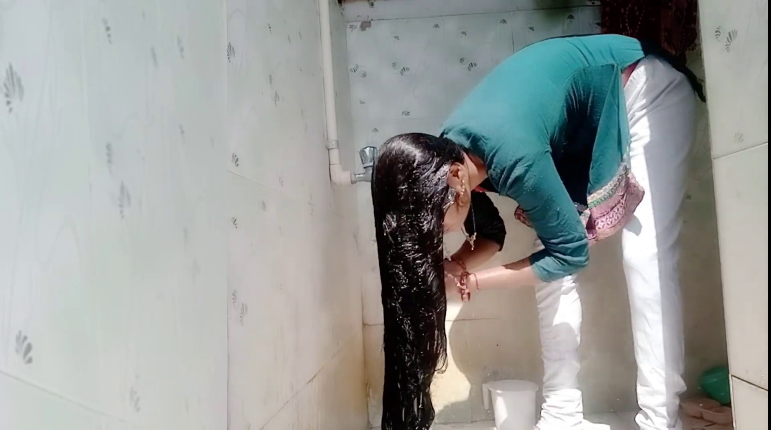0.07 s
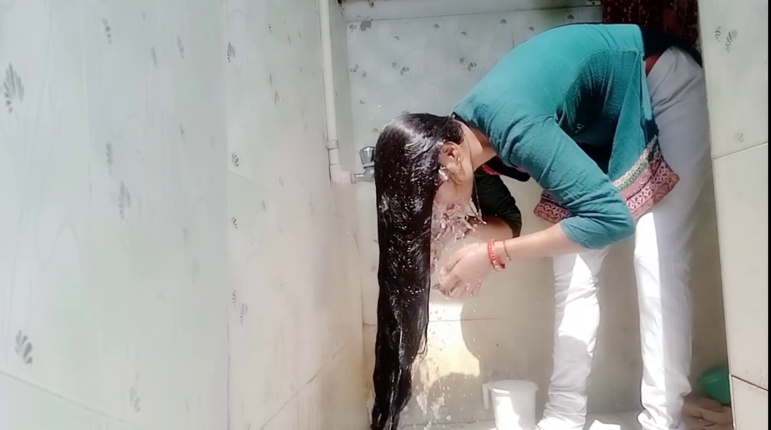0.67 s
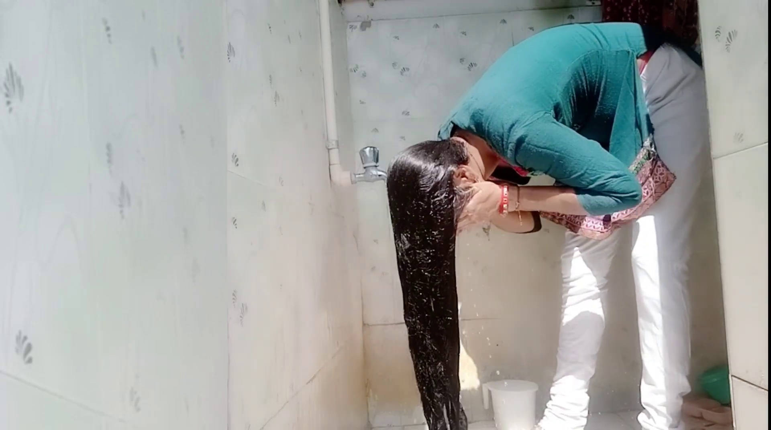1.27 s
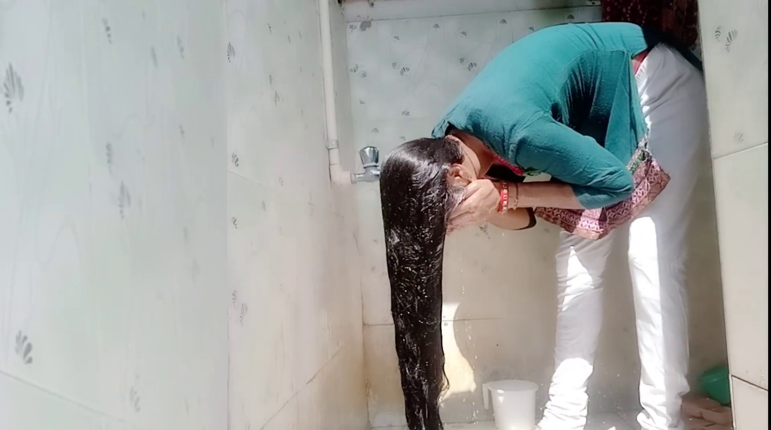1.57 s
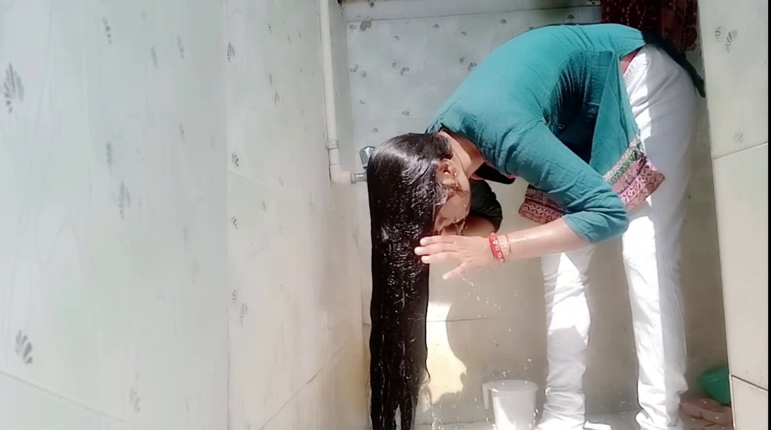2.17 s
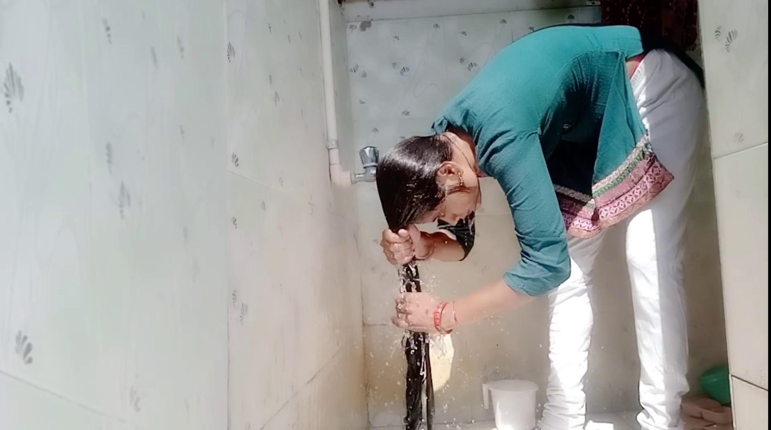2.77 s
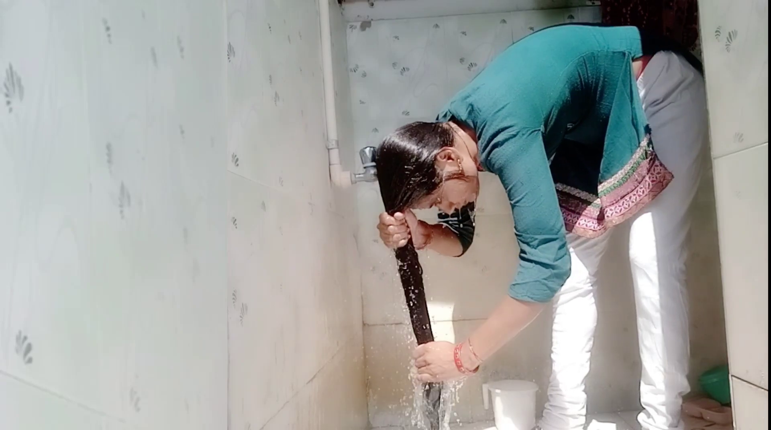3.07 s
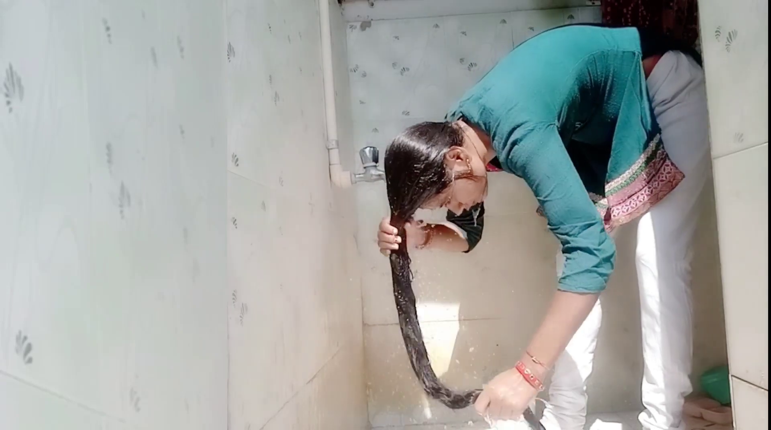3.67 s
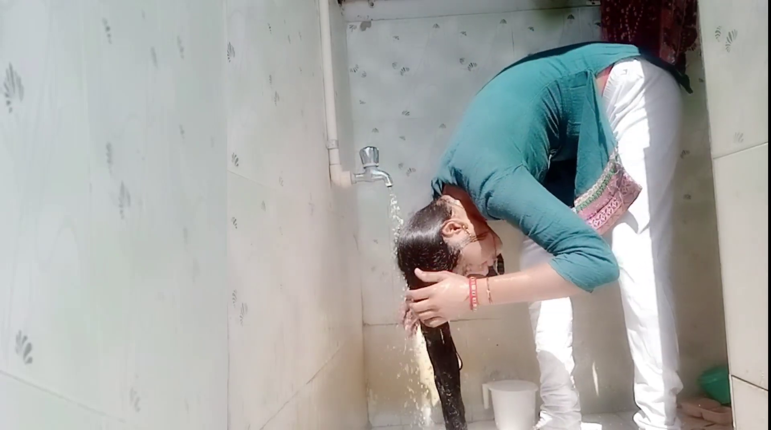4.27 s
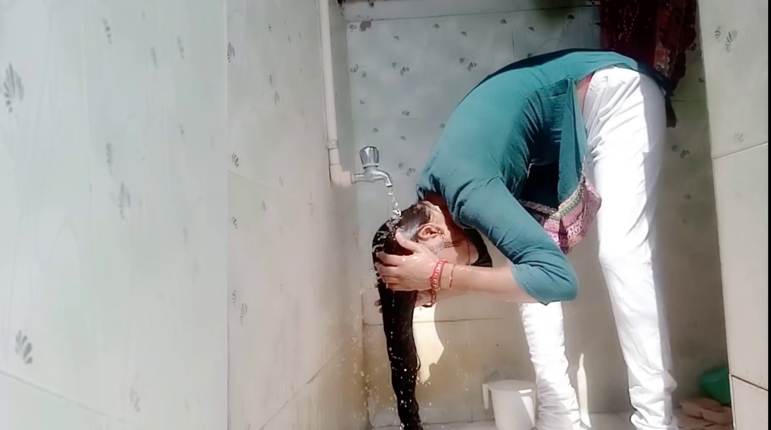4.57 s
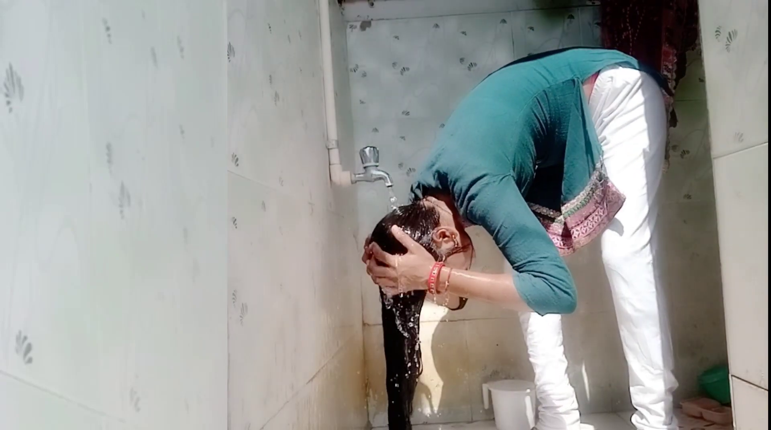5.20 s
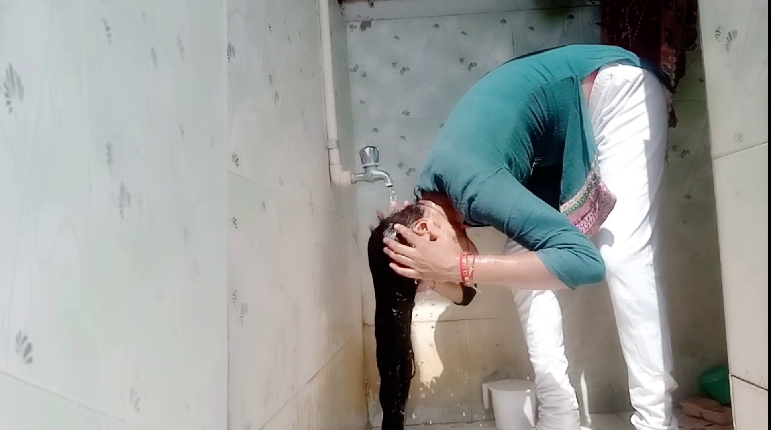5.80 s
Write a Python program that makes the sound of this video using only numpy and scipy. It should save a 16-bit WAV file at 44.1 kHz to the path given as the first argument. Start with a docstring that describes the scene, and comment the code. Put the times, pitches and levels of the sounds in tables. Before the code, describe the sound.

Water falls from a tap and off long wet hair, slapping a tiled floor in irregular splashes. Drops patter, fine spray ticks and small bubbles plop and gurgle. The splashing is strongest in the first two seconds, eases, swells again, then thins to lighter dripping with faint squelches of squeezed hair. It sounds close and bright, in a small hard-walled washing area with a faint low hum.

```python
"""Tap water slaps a wet tiled floor in slugs as someone rinses and wrings long hair in a small washing area.
Each impact excites a pocket of trapped air, thuds and throws spray; bubbles plop and gurgle as resonators.
Drops patter, fine spray ticks and the hair squelches; close hard walls return early reflections.
A low hum and a few soft bumps lie underneath; resonances of a phone's microphone port colour the treble."""
import sys
import numpy as np
from scipy import signal
from scipy.fft import rfft, irfft
from scipy.io import wavfile
from scipy.ndimage import uniform_filter1d

SR = 44100
rng = np.random.default_rng(int(sys.argv[2]) if len(sys.argv) > 2 else 0)


def store_pcm(level_fs):
    """Save levels as 16-bit WAV."""
    pcm = np.round(np.clip(level_fs, -1, 1) * 32767).astype(np.int16)
    wavfile.write(sys.argv[1], SR, np.atleast_2d(pcm).T)


N = 261954
TIME = np.arange(N) / SR
AGE = np.arange(SR // 4) / SR  # seconds since an impact

# spectral envelope of fine spray: frequency_hz, gain_db
SPRAY_SPECTRUM = [(300, 1), (1000, -2.5), (3200, -10), (4500, 3), (6500, 3), (10000, -5), (15500, -6)]


def undb(db):
    """Amplitude ratio of a level in decibels."""
    return 10 ** (np.asarray(db) / 20)


def unit(x):
    """Normalisation to an rms of 1."""
    return x / np.sqrt(np.mean(x ** 2))


def peak(x, db, size=176):
    """Normalisation of the greatest short-time rms (4 ms) to a given level."""
    return x * undb(db) / np.sqrt(uniform_filter1d(x ** 2, size).max())


def add(out, start_s, x):
    """Superposition of x on out from a given time."""
    i = max(int(start_s * SR), 0)
    out[i:i + len(x)] += x[:len(out) - i]


def convolve(x, response):
    """Convolution with an impulse response, cut to the input's length."""
    return signal.fftconvolve(x, response)[:len(x)]


def colour(x, spectrum, size=2048):
    """Minimum-phase filtering by an envelope of (frequency_hz, gain_db) points."""
    hz, db = np.transpose(spectrum)
    bins_hz = np.maximum(np.arange(size // 2 + 1) * SR / size, 1)
    gain = undb(np.interp(np.log(bins_hz), np.log(hz), db))
    cepstrum = irfft(np.log(gain))
    cepstrum[1:size // 2] *= 2  # folding the cepstrum makes the filter causal
    cepstrum[size // 2 + 1:] = 0
    return convolve(x, irfft(np.exp(rfft(cepstrum))))


def resonate(x, hz, width_hz):
    """Second-order resonance with unit gain at its centre."""
    return signal.lfilter(*signal.iirpeak(hz, hz / width_hz, fs=SR), x)


def walk(rate_hz):
    """Slow random modulation: smoothed Gaussian steps with an rms of 1."""
    hold = int(SR / rate_hz)
    steps = np.repeat(rng.standard_normal(N // hold + 2), hold)
    return unit(uniform_filter1d(steps, hold)[hold // 2:hold // 2 + N])


def tiles(x, wet_db=0, first_s=.001, last_s=.019, count=22, t60_s=0.17):
    """Room response: direct sound, early reflections drawn anew for each spot, and a reverberant tail."""
    echoes = np.zeros(len(AGE))
    lag_s = first_s + rng.random(count) * (last_s - first_s)
    polarity = np.sign(rng.standard_normal(count))
    echoes[(lag_s * SR).astype(int)] = polarity / (lag_s + last_s / 2)  # longer paths are weaker
    build_up = 1 - np.exp(-AGE / 0.0045)
    tail = rng.standard_normal(len(AGE)) * np.exp(-np.log(1000) * AGE / t60_s) * build_up
    response = undb(-1.5) * echoes / np.linalg.norm(echoes) + undb(-1) * tail / np.linalg.norm(tail)
    return x + undb(wet_db) * convolve(x, response)


def drops(per_s, spread_db, size=N):
    """Poisson process of impacts whose levels follow a capped exponential distribution."""
    when, weight, sign = rng.random((3, size))
    weight = np.minimum(-np.log(1 - weight), 4)
    return (when < per_s / SR) * undb(spread_db * weight) * np.sign(sign - .5)


def burst(break_s, scatter_db=-12):
    """Break-up on impact: one impulse, then an exponentially fading shower of droplets."""
    hits = undb(scatter_db) * drops(per_s=1500, spread_db=5.5, size=len(AGE))
    hits *= np.exp(-AGE / max(break_s, 1e-3))
    hits[0] += 1
    return hits


def damped_tone(hz, cycles, octaves_per_s):
    """Damped oscillation whose pitch glides by up to an octave, as in a bubble nearing the surface."""
    pitch_hz = hz * 2 ** np.clip(octaves_per_s * AGE, -1, 1)
    return np.sin(2 * np.pi * np.cumsum(pitch_hz) / SR) * np.exp(-AGE * hz / cycles)


def droplets(centre_hz, octaves, cycles, spread_db, count):
    """Bubble resonance: drops of random size each ring at their own pitch, on six spots of the floor."""
    spots = np.zeros((6, N))
    age = AGE[:SR // 40]
    centre_hz = np.broadcast_to(centre_hz, N)
    for k, (when, pitch, weight) in enumerate(rng.random((count, 3))):
        hz = centre_hz[int(when * N)] * 2 ** (octaves * (pitch - .5))
        ring = np.sin(2 * np.pi * hz * age) * np.exp(-age * hz / cycles) * np.sqrt(hz)
        add(spots[k % len(spots)], when * N / SR, undb(spread_db * weight ** 3) * ring)  # few are loud
    return unit(sum(tiles(spot) for spot in spots))


def background():
    """Steady low noise and a hum under random frequency and amplitude modulation."""
    # spectral envelope of the rush: frequency_hz, gain_db
    rush_spectrum = [(20, -41), (45, -24), (70, -6.5), (95, 7), (130, -1.5), (190, -8.5), (280, -2.5),
                     (450, -7.5), (800, -14), (1500, -18), (3000, -29), (8000, -52)]
    rush = unit(colour(rng.standard_normal(N), rush_spectrum))
    hum_hz = 89.4 * (1 + 0.0505 * walk(rate_hz=14))
    hum = np.sin(2 * np.pi * np.cumsum(hum_hz) / SR) * undb(2.1 * walk(rate_hz=13))
    return undb(-45) * rush + undb(-52.5) * unit(hum)


def bumps():
    """Heavy damping: dull low knocks die within a cycle or two."""
    # soft bumps: start_s, relative_level_db, pitch_hz
    knocks = [(0.851, -27.5, 93), (1.337, -33, 73), (1.779, -30, 91), (2.003, -25.5, 82), (4.997, -30, 70),
              (5.159, -20.5, 125), (5.194, -24, 106), (5.342, -25, 76.4)]
    out = np.zeros(N)
    for start_s, db, hz in knocks:
        knock = resonate(damped_tone(hz, cycles=0.95, octaves_per_s=-7), hz=2.4 * hz, width_hz=3 * hz)
        add(out, start_s, peak(knock, db - 6.5))
    return out


def squelches():
    """Band-limited crackle: water and air spit from between strands of hair under pressure."""
    # squeezes of the wet hair: start_s, relative_level_db
    squeezes = [(2.802, -41.5), (4.1587, -38), (4.7738, -42), (4.81, -47), (5.911, -40)]
    out = np.zeros(N)
    for start_s, db in squeezes:
        crackle = resonate(tiles(burst(break_s=0.011)), hz=4170, width_hz=2800)
        add(out, start_s, peak(resonate(crackle, hz=4260, width_hz=2400), db + 11.5))
    return out


def patter(spectrum, per_s, spread_db, cluster_db, count=4):
    """Modulated shot noise: drops land in clusters on several spots of the floor."""
    spots = [tiles(drops(per_s, spread_db) * undb(cluster_db * walk(rate_hz=45))) for _ in range(count)]
    return unit(colour(sum(spots), spectrum))


def spray():
    """Atomised water: a far spatter, tiny resonating bubbles and near drops with less reverberation."""
    far = undb(3.5) * patter(SPRAY_SPECTRUM, per_s=90, spread_db=5, cluster_db=0.5)
    fizz = undb(4) * droplets(centre_hz=9540, octaves=1.46, cycles=8, spread_db=14.5, count=1400)
    near_hits = colour(drops(per_s=32, spread_db=4.5), SPRAY_SPECTRUM)
    near = undb(2) * unit(tiles(near_hits, wet_db=-2.5))
    spurts = undb(2.1 * walk(rate_hz=110))  # the stream breaks up unevenly
    return (far + fizz) * spurts + near


def tick(db, hz):
    """Impulse excitation: a fast drop shatters on bare tile, and a tiny air pocket sets its pitch."""
    pocket = resonate(burst(break_s=0.0029, scatter_db=0), hz, width_hz=1300)
    crack = resonate(pocket, hz, width_hz=11000)
    return peak(tiles(crack, wet_db=-5), db)


def ticks(spray_db, count=20, centre_hz=6440, octaves=0.25, range_db=4):
    """Isolated impacts: hard drops at set times, and random ones whose level follows the spray."""
    # the hardest drops on bare tile: start_s, level_db, pitch_hz
    hard_drops = [(0.084, -35, 7040), (0.3591, -32, 6260), (0.9774, -29.5, 6390), (0.9992, -37, 6200),
                  (1.076, -30, 13700), (1.447, -32, 6900), (1.5312, -23.5, 6700), (1.7438, -31, 6330),
                  (1.7893, -24, 6040), (2.1232, -23.5, 5840), (2.1615, -33, 7300), (2.5063, -32, 6290),
                  (2.8624, -33, 6300), (2.901, -36, 6050), (3.239, -28, 14100), (3.3568, -31, 6050),
                  (3.5776, -32, 6300), (3.7988, -35.5, 6150), (3.8865, -31.5, 6160), (4.3902, -32, 6350),
                  (5.818, -38, 14200), (5.8447, -28.5, 5900)]
    out = np.zeros(N)
    for start_s, db, hz in hard_drops:
        add(out, start_s, tick(db, hz))
    for when, pitch, weight in rng.random((count, 3)):
        db = spray_db[int(when * N)] + 11.5 + range_db * (weight - .5)
        hz = centre_hz * 2 ** (octaves * (pitch - .5))
        add(out, when * N / SR, tick(db, hz))
    return out


def gurgles(attack_s=0.075, release_s=0.026, octaves_per_s=-1.26):
    """Resonance falls with size: bubbles grow as a thick stream digs into the puddle, so the pitch sinks."""
    # streams churning the puddle: start_s, length_s, level_db, first_pitch_hz
    streams = [(0.38, 0.26, -36, 1470), (3.06, 0.27, -55, 1520), (3.53, 0.12, -44.5, 1220),
               (4.6, 0.245, -53, 1460)]
    envelope = np.zeros(N)
    pitch_hz = np.full(N, float(streams[0][3]))
    for start_s, length_s, db, hz in streams:
        age = np.maximum(TIME - start_s, 0)
        attack = np.minimum(age / attack_s, 1)
        release = np.exp(-np.maximum(age - length_s, 0) / release_s)
        envelope += undb(db) * attack * release
        pitch_hz = np.where(age > 0, hz * 2 ** (octaves_per_s * np.minimum(age, length_s)), pitch_hz)
    return envelope * droplets(pitch_hz, octaves=1.17, cycles=15, spread_db=8.5, count=2400)


def plops():
    """Minnaert resonance: large bubbles ring briefly with a bending pitch; the puddle holds deeper ones."""
    # bubbles in the film on the floor: start_s, relative_level_db, pitch_hz, glide_octaves_per_s
    film_bubbles = [(0.279, -30, 1793, -3), (0.382, -30.5, 1265, 11), (0.396, -27.5, 1570, 4),
                    (0.453, -29, 1930, -4), (2.858, -36, 1502, -1), (3.249, -31.5, 1640, -4),
                    (3.515, -30.5, 2090, 6), (3.754, -30, 1250, 9.5), (3.762, -37, 1464, 5),
                    (4.468, -40, 973, 22.5), (4.585, -33, 1426, -9.5), (4.72, -32, 1262, -6),
                    (4.735, -36.5, 1143, -13.5), (4.819, -41.5, 1060, -2), (4.88, -42, 1474, 3),
                    (5.027, -36.5, 1665, -2.5), (5.068, -44, 1260, -2.5)]
    # deep gulps in the puddle: start_s, relative_level_db, pitch_hz
    gulps = [(0.587, -32, 710), (0.697, -25, 682), (3.545, -31.5, 680)]
    out = np.zeros(N)
    for start_s, db, hz, glide in film_bubbles:
        start_hz = hz * 2 ** (-glide * 0.0016)  # the glide passes the listed pitch after 1.6 ms
        ring = damped_tone(start_hz, cycles=11.5, octaves_per_s=glide)
        add(out, start_s, peak(tiles(ring, wet_db=-2.5), db + 0.5))
    for start_s, db, hz in gulps:
        hits = burst(break_s=0.0085, scatter_db=-15)
        ring = convolve(hits, damped_tone(hz, cycles=3.1, octaves_per_s=6.8))
        add(out, start_s, peak(tiles(ring), db - 2.5))
    return out


def falling_water(patter_db, spray_db):
    """Incoherent sum of drop impacts, ringing bubbles and spray, with levels that follow the flow."""
    # spectral envelope of the drop impacts: frequency_hz, gain_db
    impact_spectrum = [(300, -30), (800, -41), (1300, -6.5), (1900, -6), (2600, 5), (3300, 0.5),
                       (5000, -3.5), (9000, -31)]
    impacts = patter(impact_spectrum, per_s=140, spread_db=-1, cluster_db=5)
    rings = droplets(centre_hz=2215, octaves=1, cycles=9.9, spread_db=14, count=800)
    return undb(patter_db + 0.5) * impacts + undb(patter_db - 3) * rings + undb(spray_db - 0.5) * spray()


def slaps(typical_break_s=0.0045, typical_db=-28.5, db_per_doubling=12):
    """Liquid impact: each slug compresses a heavily damped air pocket, thuds and throws spray."""
    # slugs of water hitting the floor: start_s, pocket_db, pocket_hz, thud_db, spray_db
    slugs = [(0.0136, -22, 2630, -46, -55), (0.1093, -15.5, 2330, -36, -42),
             (0.1501, -11.5, 2390, -20, -37), (0.216, -23, 2430, -34, -31.5),
             (0.698, -24.5, 1960, -23, -37), (0.8435, -24, 2760, -38, -29), (0.8737, -14, 2120, -23.5, -31),
             (0.8939, -18.5, 2180, -24, -36), (0.938, -24, 3040, -48, -30),
             (0.9652, -23.5, 2480, -36.5, -35.5), (1.0762, -21, 2660, -33, -27.5),
             (1.2405, -28, 2750, -55, -55), (1.264, -18, 2400, -46, -41), (1.3505, -24, 2300, -51, -32),
             (1.3815, -29, 2800, -49, -32), (1.467, -31, 2480, -39, -27.5),
             (1.7943, -15.5, 2630, -28.5, -31), (1.8021, -19, 2680, -38, -41),
             (1.8414, -21, 2370, -34, -29), (1.932, -26.5, 3060, -51, -31), (1.9608, -27, 2470, -49, -26.5),
             (2.0018, -36.5, 2510, -37.5, -32), (2.1216, -31.5, 2650, -40.5, -29.5),
             (2.2218, -32.5, 2970, -35.5, -34), (2.2505, -33, 2480, -37, -26.5),
             (2.394, -28.5, 2680, -33, -32), (2.5652, -25.5, 2760, -34.5, -33),
             (2.8049, -26, 2980, -55, -37), (2.9495, -37, 2320, -54, -56), (3.0067, -30, 2390, -49, -31.5),
             (3.0503, -26.5, 2670, -49, -33.5), (3.105, -23.5, 1950, -55, -50),
             (3.1556, -19.5, 2370, -25, -46), (3.308, -27, 2730, -47, -32), (3.3802, -26.5, 2080, -50, -41),
             (3.4098, -22.5, 1910, -50, -48), (4.0198, -33.5, 2330, -37.5, -37),
             (4.1048, -32, 2780, -44, -32), (4.1584, -32, 2580, -46, -37), (4.2866, -28, 2500, -27, -30.5),
             (4.3593, -26.5, 2300, -50, -36), (4.7734, -26, 2700, -35, -36.5),
             (4.9277, -28.5, 2780, -61, -51), (5.2333, -40, 2100, -44, -47.5),
             (5.6016, -29, 2490, -49, -42), (5.7745, -35, 2900, -56, -33.5),
             (5.8327, -31.5, 2350, -60, -58)]
    out = np.zeros(N)
    for start_s, pocket_db, pocket_hz, thud_db, spray_db in slugs:
        size_db = (pocket_db + spray_db) / 2  # a big slug takes longer to break up
        break_s = typical_break_s * 2 ** ((size_db - typical_db) / db_per_doubling)
        hits = tiles(burst(break_s, scatter_db=-11))
        pocket = resonate(resonate(hits, pocket_hz, width_hz=750), pocket_hz, width_hz=1500)
        thud = resonate(resonate(hits, hz=1690, width_hz=730), hz=1150, width_hz=8200)
        scatter = tiles(burst(1.13 * break_s, scatter_db=-7.5))  # the spray lasts a little longer
        mist = colour(scatter, SPRAY_SPECTRUM)
        add(out, start_s, peak(pocket, pocket_db) + peak(thud, thud_db) + peak(mist, spray_db))
    return out


def scene():
    """Superposition of the falling water, its single splashes and the low background."""
    # water reaching the floor as the hair holds it back or lets it go: time_s, patter_db, spray_db
    flow = [(0, -29.5, -38.5), (0.06, -39, -51), (0.16, -27.5, -40.5), (0.34, -36, -51.5),
            (0.63, -32.5, -48), (0.78, -46.5, -50), (0.83, -45, -57), (0.92, -38, -44), (1.21, -41.5, -48),
            (1.65, -42, -45.5), (2.28, -43.5, -47), (2.5, -48, -54), (2.7, -51.5, -57.5),
            (2.97, -44.5, -55.5), (3.1, -31.5, -45), (3.4, -34.5, -44.5), (3.72, -38, -52),
            (4.08, -48, -48.5), (4.36, -36.5, -47), (4.65, -48.5, -56.5), (5.0, -48, -60.5),
            (5.3, -54, -58), (5.78, -51.5, -61.5), (5.94, -46.5, -47.5)]
    time_s, *levels_db = np.transpose(flow)
    patter_db, spray_db = (np.interp(TIME, time_s, db) for db in levels_db)  # relative levels
    water = falling_water(patter_db, spray_db) + gurgles() + slaps() + squelches() + plops()
    return (water + ticks(spray_db) + bumps() + background())[None]


def record(dry, low_cut_hz=42, high_cut_hz=15500, ceiling=0.67):
    """Cavity resonance in the microphone port colours the treble; soft clipping and band limits follow."""
    # broad response of the port: frequency_hz, gain_db
    port_response = [(2000, -1), (2900, -4.5), (3250, -10), (3650, -30), (5500, -26), (6500, -19),
                     (7800, -22.5), (10000, -20.5), (12400, -19), (13500, -17), (14600, -9), (15500, -7.5)]
    # resonances of the port: centre_hz, width_hz, boost_db
    port_modes = [(4056, 250, 14.1), (5030, 215, 10.1), (6142, 306, 16.5), (7076, 344, 11.5),
                  (8260, 160, 7.7), (9200, 450, 9.4), (11490, 610, 9.5), (13630, 550, 16.4)]
    sound = colour(dry[0], port_response)
    for hz, width_hz, db in port_modes:
        sound = sound + (undb(db) - 1) * resonate(sound, hz, width_hz)
    sound = signal.sosfilt(signal.butter(2, low_cut_hz, "highpass", fs=SR, output="sos"), sound)
    sound = ceiling * np.tanh(sound / ceiling)
    return signal.sosfilt(signal.ellip(10, .2, 80, high_cut_hz, fs=SR, output="sos"), sound)[None]


dry = scene()
out = record(dry)
store_pcm(out)
```